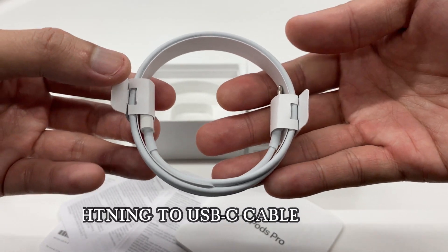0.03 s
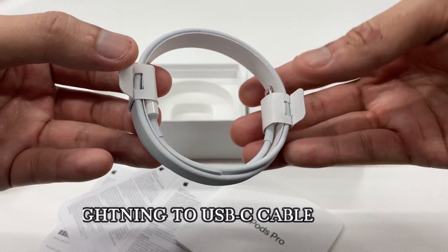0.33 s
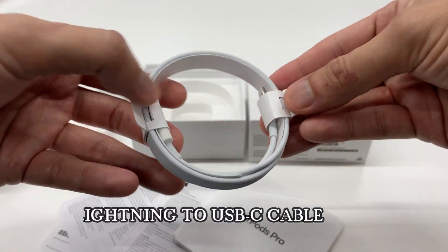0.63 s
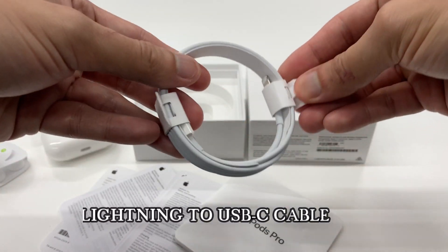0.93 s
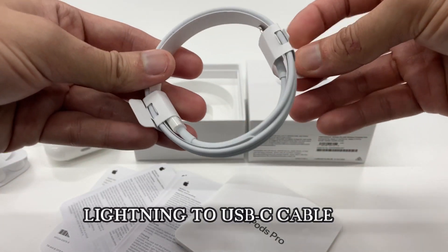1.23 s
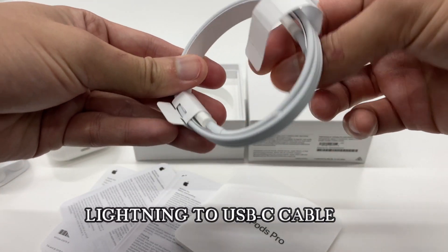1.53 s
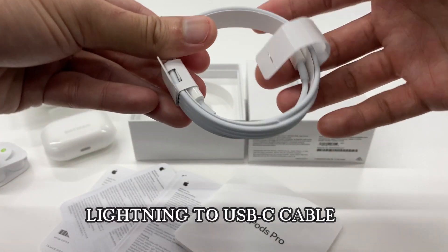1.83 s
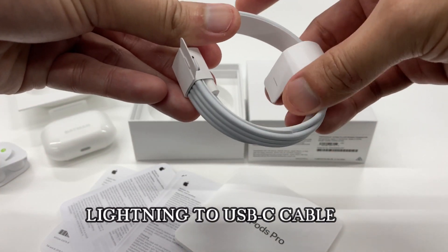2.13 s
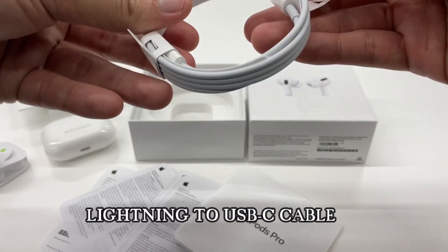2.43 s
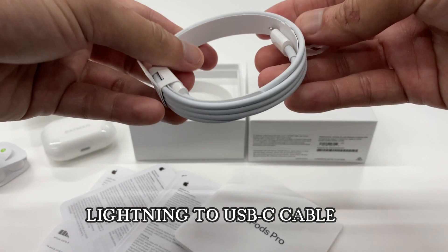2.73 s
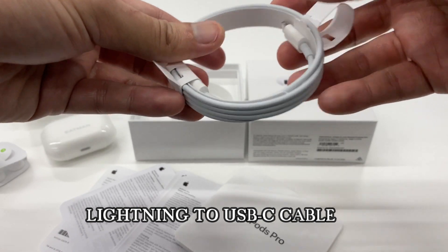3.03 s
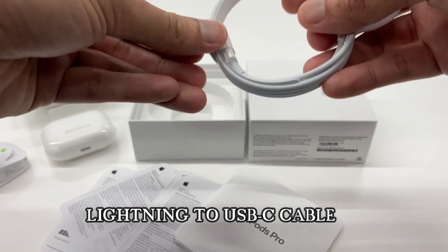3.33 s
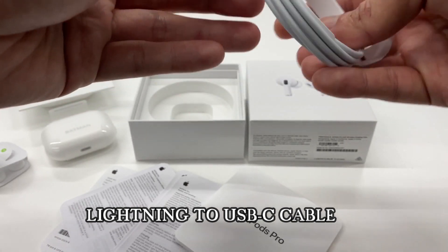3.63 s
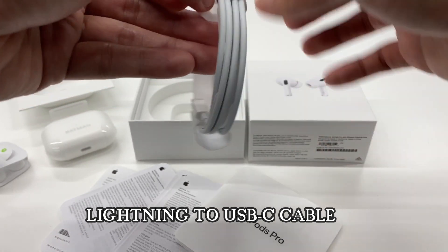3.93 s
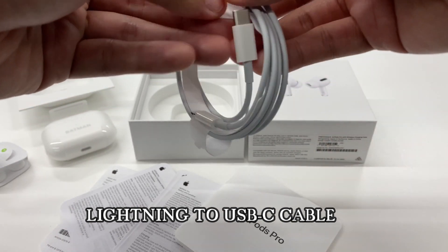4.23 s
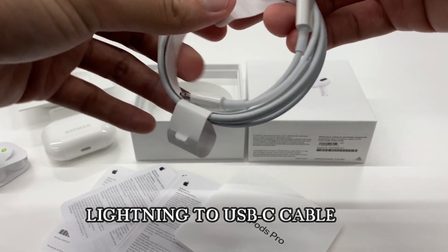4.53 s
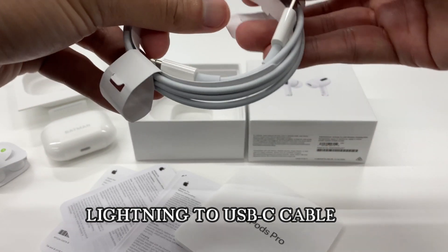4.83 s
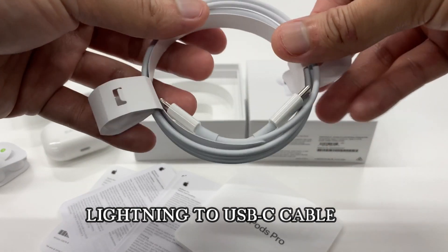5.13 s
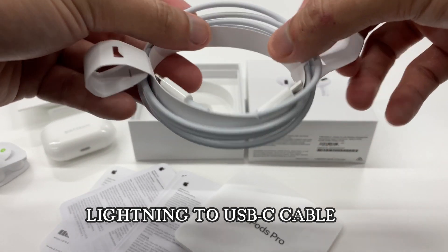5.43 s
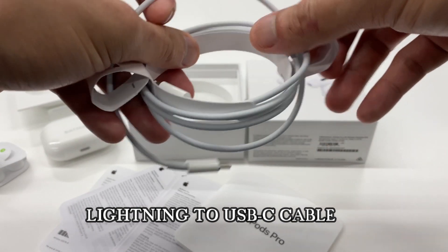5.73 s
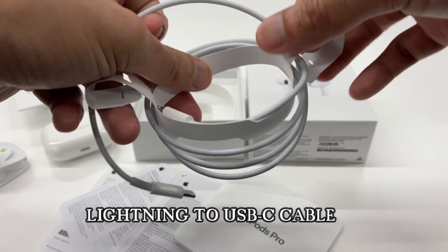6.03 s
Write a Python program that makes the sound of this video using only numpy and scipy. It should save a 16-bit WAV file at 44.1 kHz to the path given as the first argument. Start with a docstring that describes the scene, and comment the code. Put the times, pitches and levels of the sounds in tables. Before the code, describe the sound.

Close to the microphone in a small room, fingers slide over a coiled cable and undo its paper ties, with thin hissing rubs, fine crinkles and light ticks of the plugs. One tab lets go with a loud, sharp snap, followed by a run of dull bumps from arms on the table. Another snap comes later, then busier rubbing and one more bump. Ventilation murmurs steadily behind.

```python
"""A small room, microphone close over a table: two hands undo the paper ties of a coiled charging cable.
First fingers slide on card and cable, the paper crinkles and the plugs tick against the coil.
At 1.6 s a tab gives the loudest snap, and the arms nudge the table with a run of dull bumps.
More bumps come near 3.3 s, a sharp snap at 3.9 s, then busier rubbing, with another shove at 5.4 s.
Ventilation murmurs behind from start to end."""
import sys
import numpy as np
from scipy import signal
from scipy.fft import rfft, irfft, next_fast_len
from scipy.io import wavfile
from scipy.ndimage import uniform_filter1d

SR = 44100
rng = np.random.default_rng(int(sys.argv[2]) if len(sys.argv) > 2 else 0)


def waveform_to_disk(signal):
    """Save audio, clipped to [-1, 1], as 16-bit WAV at the path in sys.argv[1]."""
    frames = np.transpose(np.atleast_2d(signal))
    scaled = np.clip(frames, -1, 1) * 32767
    samples = np.round(scaled).astype(np.int16)
    wavfile.write(sys.argv[1], SR, samples)


N = 273420
TIME = np.arange(N) / SR

# the card's body, knocked or scraped: (frequency [Hz], relative level [dB])
CARD_SPECTRUM = [(500, -15.5), (1200, -2.5), (2000, -9.5), (2900, -0.5), (4000, -3.5), (5100, 1),
                 (6000, -1.5), (7200, -0.5), (8500, -21.5), (12000, -26.5)]


def snaps_and_ticks(snap_db, body_db, crack_t60_ms, rise_share, ring_width_hz, size=2048):
    """A tie or plug lets go: a bright snap and a knock in the card. Quick ones crack, slow ones swell."""
    # ties and plugs: (time [s], relative level [dB], knock offset [dB], ring [Hz], decay by 60 dB [ms])
    releases = [(0.354, -64, -14, 5000, 3.3), (0.736, -57, -13, 5000, 11), (0.980, -45, -11, 7600, 4.6),
                (1.041, -40, -1.5, 4570, 16), (1.064, -61, -9, 3900, 3), (1.462, -67.5, 9, 5200, 3.7),
                (1.5606, -36, 1, 5060, 5), (1.5638, -24, -12.5, 5260, 5.7), (2.320, -61.5, -2, 3100, 6),
                (2.412, -42.5, 0.5, 7700, 13), (2.431, -43, 0.5, 3730, 17), (2.961, -69.5, 13.5, 5300, 7.2),
                (3.011, -51, 9.5, 2820, 2.9), (3.057, -55.5, 10.5, 3400, 4.1), (3.554, -49.5, -6, 7200, 10),
                (3.644, -46, -7, 6800, 16), (3.811, -59, 3, 7100, 9.5), (3.932, -33, -23, 7700, 3.9),
                (4.299, -49.5, -3.5, 5000, 26), (4.367, -57, 1, 2500, 11), (4.514, -59, 4, 2800, 4.4),
                (4.674, -39.5, -9.5, 5460, 27), (4.839, -61, 6, 2700, 6), (5.039, -49, 3.5, 4000, 25),
                (5.081, -54, 5.5, 6700, 5), (5.312, -56, 4.5, 5750, 7), (5.383, -53, -10, 4900, 13.7),
                (5.697, -47.5, -10, 5400, 27), (5.826, -51, 9, 4940, 2.4), (5.858, -53.5, -11, 3400, 3.5)]
    # the bright snap: (frequency [Hz], relative level [dB])
    snap_spectrum = [(1000, -23.5), (2500, -31), (3800, -18), (5200, -5.5), (6300, -8), (8200, 1),
                     (9200, -2.5), (10400, 2), (12000, -5.5), (14500, -3.5), (16500, -16.5)]
    out = np.zeros((2, N + size))
    noise = np.pad(stereo_noise(), ((0, 0), (0, size)))
    ms = TIME[:size] * 1000
    burst_gain = np.sqrt(.003 * SR / size)   # levels count a burst's energy as if packed into 3 ms
    for start, level_db, knock_db, ring_hz, t60_ms in releases:
        at = int(start * SR)
        swell = 1 - np.exp(-ms / (rise_share * t60_ms))
        force = rms_one(noise[:, at:at + size] * swell * from_db(-60 * ms / t60_ms))
        force[:, 0] += (crack_t60_ms / t60_ms) ** 2 * np.sqrt(size)   # the opening crack
        snap = rms_one(colour(force, snap_spectrum))
        ring = rms_one(resonance(force, ring_hz, ring_width_hz))
        knock = rms_one(rms_one(colour(force, CARD_SPECTRUM)) + ring)
        burst = from_db(snap_db) * snap + from_db(knock_db + body_db) * knock
        out[:, at:at + size] += from_db(level_db) * burst_gain * burst
    return out[:, :N]


def finger_rubbing(slips_per_s, size_spread_db, crinkle_db, scrape_db, uneven_db):
    """Sliding skin hisses thinly and catches in tiny slips; under pressure the card scrapes lower."""
    # hiss of sliding skin: (frequency [Hz], relative level [dB])
    skin_spectrum = [(3000, -42.5), (5700, -20.5), (7200, -12.5), (8300, 2), (9800, 2.5), (11300, -2.5),
                     (13800, -3), (15600, -7), (16100, -23)]
    hiss_strength, scrape_strength = finger_strokes(arch=0.6, ease_s=.025, resting_db=-88)
    slip_sizes = from_db(size_spread_db * np.minimum(rng.exponential(1, N), 4))
    slipping = rng.random(N) < slips_per_s / SR
    slips = rms_one(slip_sizes * slipping * rng.standard_normal(N))
    friction = stereo_noise() + from_db(crinkle_db) * slips
    force = wandering_modes(friction, patchy_db=3.0, width_hz=340, changes_per_s=28)
    hiss = hiss_strength * rms_one(colour(force, skin_spectrum))
    scrape = from_db(scrape_db) * scrape_strength * rms_one(colour(force, CARD_SPECTRUM))
    return from_db(uneven_db * drift(60)) * (hiss + scrape)


def finger_strokes(arch, ease_s, resting_db):
    """Strength of hiss and scrape: each stroke speeds up and slows down; resting fingers rub faintly."""
    # along card and cable: (start [s], length [s], friction level [dB], scrape offset [dB])
    strokes = [(0.025, .12, -65.5, -29), (0.195, 0.09, -53.5, -25), (0.287, 0.098, -56.5, -29),
               (0.61, 0.063, -65, -10), (0.698, .18, -60, -9), (1.015, 0.079, -64, -0.5),
               (1.26, 0.019, -74, -2), (1.464, 0.075, -66.5, -0.5), (1.547, 0.16, -63.5, 0),
               (1.724, .11, -58, -9), (1.876, 0.17, -65.5, -5.5), (2.192, 0.24, -65, -5),
               (2.415, .12, -63, 0), (2.54, 0.29, -66, -5.5), (2.97, 0.13, -67.5, 3.5),
               (3.153, 0.16, -61, -10.5), (3.414, 0.021, -53.5, -12), (3.544, 0.27, -71.5, -2),
               (3.864, 0.052, -56.5, -8), (3.91, 0.22, -73, 1), (4.172, 0.078, -46.5, -10.5),
               (4.248, .11, -62.5, -5.5), (4.616, 0.047, -56, -4.5), (4.657, 0.079, -45, -7.5),
               (4.749, 0.078, -53, -6.5), (4.817, 0.11, -64, -7), (4.905, .12, -56.5, -8),
               (5.054, 0.15, -56, -5), (5.225, 0.12, -62, -4), (5.338, 0.26, -68.5, -4.5),
               (5.552, .18, -63, -3.5), (5.796, .10, -58.5, -3.5), (5.916, 0.056, -61.5, -2.5),
               (6.018, .12, -68.5, -4.5), (6.161, 0.12, -55, -8)]
    power = np.zeros((2, N))
    for start, length, level_db, scrape_db in strokes:
        progress = np.clip((TIME - start) / length, 0, 1)
        speed = (1 - (2 * progress - 1) ** 2) ** arch
        power += (speed * from_db([[level_db], [level_db + scrape_db]])) ** 2
    eased = np.abs(uniform_filter1d(power, int(ease_s * SR) + 1))
    return np.sqrt(eased + from_db(resting_db) ** 2)


def wandering_modes(force, patchy_db, width_hz, changes_per_s, count=24):
    """As the finger moves, resonances of card and cable come and go."""
    modes_hz = np.linspace(1500, 15500, count) * (1 + .015 * rng.standard_normal(count))
    modes = ((-1) ** k * resonance(force, hz, width_hz) * from_db(patchy_db * drift(changes_per_s))
             for k, hz in enumerate(modes_hz))
    return rms_one(sum(modes))


def table_under_arms(tremble_db, lumpy_db, shaken_db, shaken_s, left_db, right_lag_s):
    """Bumps and a lumpy rumble that swells with them reach the microphone through the table."""
    # slow course of the rumble: (time [s], relative level [dB])
    tremble = [(0.0, -44.5), (0.15, -48.5), (0.36, -47.5), (1.59, -49.5), (1.76, -28.5), (1.97, -47.5),
               (2.8, -53.5), (3.3, -43.5), (3.5, -53.5), (4.77, -67), (5.22, -54), (5.4, -41),
               (5.61, -54.5), (6.2, -59)]
    # the table's rumble: (frequency [Hz], relative level [dB])
    table_spectrum = [(15, -54), (30, -14), (57, 3), (85, -1.5), (130, -7), (200, -11), (320, -26),
                      (700, -64)]
    level_db = np.interp(TIME, *np.transpose(tremble))
    rumble = from_db(lumpy_db * drift(25)) * rms_one(colour(stereo_noise(), table_spectrum))
    bumps = table_bumps(width_cycles=0.59, gain_db=0.5, ring_hz=79.6, ring_width_hz=13, ring_db=-7.5)
    bump_rms = np.sqrt(np.abs(uniform_filter1d(bumps ** 2, int(shaken_s * SR))))
    strength = np.hypot(from_db(level_db + tremble_db), from_db(shaken_db) * bump_rms)
    late_bumps = np.interp(TIME - right_lag_s, TIME, bumps)
    balance = from_db([[left_db / 2], [-left_db / 2]])
    return balance * (strength * rumble + np.array([bumps, late_bumps]))


def table_bumps(width_cycles, gain_db, ring_hz, ring_width_hz, ring_db):
    """A soft push swells and dies within a cycle or two, and leaves the table ringing briefly."""
    out = np.zeros(N)
    pushes = arm_pushes(gap_s=.038, timing_share=.2, fade_db=14, scatter_db=1.0, pitch_octaves=0.43)
    for time, peak_db, hz, phase in pushes:
        near = slice(*np.searchsorted(TIME, [time - .1, time + .1]))
        cycles = (TIME[near] - time) * hz
        swell = np.exp(-.5 * (cycles / width_cycles) ** 2)
        out[near] += from_db(peak_db) * swell * np.cos(2 * np.pi * (cycles + phase))
    return from_db(gain_db) * (out + from_db(ring_db) * resonance(out, ring_hz, ring_width_hz))


def arm_pushes(gap_s, timing_share, fade_db, scatter_db, pitch_octaves, count=10):
    """A shoving arm sticks and slips: a run of pushes, weaker away from the shove's crest."""
    # arms against the table: (start [s], crest [s], end [s], relative peak [dB], pitch [Hz])
    shoves = [(0.0, 0.195, 0.45, -33.5, 84), (0.69, 0.79, 0.91, -20, 81), (1.536, 1.669, 1.71, -13.5, 84),
              (1.688, 1.775, 1.95, -13, 98.9), (2.17, 2.291, 2.49, -25.5, 135),
              (3.20, 3.335, 3.27, -20, 170), (4.21, 4.235, 4.35, -35.5, 116),
              (5.304, 5.365, 5.385, -15, 133), (5.43, 5.456, 5.56, -23, 87), (6.15, 6.174, 6.20, -34.5, 70)]
    steps = np.arange(-count, count + 1)
    for start, crest, end, peak_db, hz in shoves:
        chance = rng.uniform(-1.02, 1, (len(steps), 3)) * (steps != 0)[:, None]   # none at the crest
        for step, (late, strong, high), phase in zip(steps, chance, rng.random(len(steps))):
            time = crest + gap_s * (step + timing_share * late)
            if start < time < end:
                fade = np.interp(time, [start, crest, end], [1, 0, 1])
                level_db = peak_db - fade_db * fade + scatter_db * strong
                yield time, level_db, hz * 2 ** (pitch_octaves * high), phase


def small_room(direct, t60_s, build_s, tail_db, echo_s, echo_db):
    """Close up, the direct sound leads; the table top adds one reflection, the room a short tail."""
    t = TIME[:SR // 2]
    tail = stereo_noise()[:, :len(t)] * from_db(-60 * t / t60_s) * (1 - np.exp(-t / build_s))
    response = from_db(tail_db) * rms_one(tail) / np.sqrt(len(t))
    response[:, int(echo_s * SR)] += from_db(echo_db)
    return direct + signal.fftconvolve(direct, response, axes=1)[:, :N]


def ventilation(rush_db, waver_db):
    """Room tone behind the hands: a dull steady rush of air with faint wavering fan tones."""
    # tones of the fan: (frequency [Hz], rms level they waver around [dB])
    fan_tones = [(150.7, -54.5), (204.6, -57.5), (788, -84)]
    # moving air: (frequency [Hz], relative level [dB])
    air_spectrum = [(20, -32.5), (50, -3.5), (100, -9.5), (170, -6.5), (230, -2.5), (340, -8), (480, -7),
                    (630, -13.5), (800, -11), (1300, -24), (1900, -30.5), (3200, -31), (5000, -42.5),
                    (9000, -65.5)]
    hum = np.zeros(N)
    for hz, level_db in fan_tones:
        amplitude = np.sqrt(2) * from_db(level_db + waver_db * drift(4.1))
        hum += amplitude * np.sin(2 * np.pi * hz * TIME + drift(3))
    return from_db(rush_db) * rms_one(colour(stereo_noise(), air_spectrum)) + hum


def stereo_noise():
    """White noise, alike on both sides of the microphone except in the middle range."""
    # likeness of left and right: (frequency [Hz], correlation [0 to 1])
    likeness = [(60, 0.95), (200, 1), (400, 0.76), (700, 0.29), (1300, 0.21), (3000, 0.057), (5000, 0.27),
                (8000, 0.84), (12000, 1)]
    mid, side = rfft(rng.standard_normal((2, N)))
    alike = at_hz(likeness, np.fft.rfftfreq(N, 1 / SR))
    return irfft(np.sqrt(1 + alike) * mid + np.sqrt(1 - alike) * side * [[1], [-1]], N) / np.sqrt(2)


def colour(x, spectrum):
    """Causal (minimum-phase) filter with the given spectrum."""
    size = 2 * next_fast_len(x.shape[-1] // 2 + 1)
    gain = from_db(at_hz(spectrum, np.fft.rfftfreq(size, 1 / SR)))
    cepstrum = irfft(np.log(gain))
    cepstrum[1:size // 2] *= 2
    cepstrum[size // 2 + 1:] = 0
    return irfft(rfft(x, size) * np.exp(rfft(cepstrum)))[..., :x.shape[-1]]


def resonance(x, hz, width_hz):
    """Band-pass with a gain of 1 at its peak."""
    return signal.lfilter(*signal.iirpeak(hz, hz / width_hz, fs=SR), x)


def drift(rate, count=2048):
    """A random curve with a spread of 1, changing about rate times a second."""
    return np.interp(TIME * rate, np.arange(count), rng.standard_normal(count)) * np.sqrt(3 / 2)


def at_hz(points, hz):
    """Read a spectrum on a log-frequency axis."""
    known_hz, values = np.transpose(points)
    return np.interp(np.log(hz + 1e-3), np.log(known_hz), values)


def from_db(db):
    """Decibels to gain."""
    return 10 ** (np.asarray(db) / 20)


def rms_one(x):
    """Scale to an rms of 1."""
    return x / np.sqrt(np.mean(x ** 2) + 1e-20)


def scene():
    """Hands close to the microphone, the table below them, ventilation behind."""
    air = ventilation(rush_db=-48, waver_db=2.5)
    snaps = snaps_and_ticks(snap_db=5.5, body_db=2.5, crack_t60_ms=1.8, rise_share=0.092,
                            ring_width_hz=940)
    slides = finger_rubbing(slips_per_s=570, size_spread_db=4.5, crinkle_db=-8.5, scrape_db=2.5,
                            uneven_db=3.0)
    hands = small_room(snaps + slides, t60_s=0.23, build_s=0.0005, tail_db=-13.5,
                       echo_s=0.0048, echo_db=-17)
    table = table_under_arms(tremble_db=3.5, lumpy_db=3.0, shaken_db=-7, shaken_s=0.055,
                             left_db=.8, right_lag_s=0.0012)
    return hands + air + table


def record(dry):
    """A stereo microphone whose two ports differ in delay and colour; the top is cut at 16.4 kHz."""
    # left port behind the right: (frequency [Hz], phase lag [rad])
    port_lag = [(300, 0.5), (700, -1), (1400, -4), (2000, -6), (3000, -6), (5800, -5), (6700, -6),
                (8400, -3.5), (10100, 0), (12000, 3), (13900, 6.5), (15800, 8.5)]
    # left port over the right: (frequency [Hz], level [dB])
    port_tilt = [(1200, -0.5), (3000, 5.5), (4100, 1), (5100, 6), (6000, 1.5), (7800, 2), (9000, -0.5)]
    hz = np.fft.rfftfreq(N, 1 / SR)
    tilt = from_db(at_hz(port_tilt, hz) / 2)
    ports = np.array([tilt * np.exp(-1j * at_hz(port_lag, hz)), 1 / tilt])
    heard = irfft(rfft(dry) * ports, N)
    low_pass = signal.ellip(10, .2, 80, 16400, fs=SR, output="sos")
    return signal.sosfilt(low_pass, heard)


dry = scene()
out = record(dry)
waveform_to_disk(out)
```